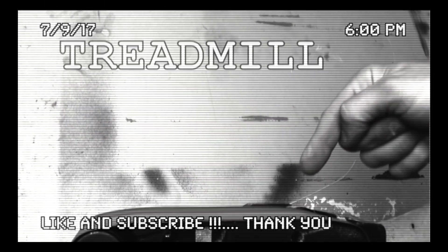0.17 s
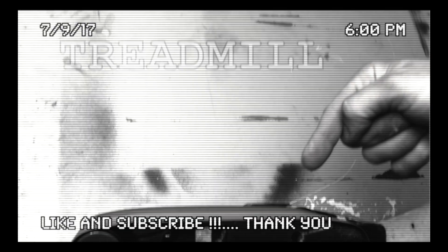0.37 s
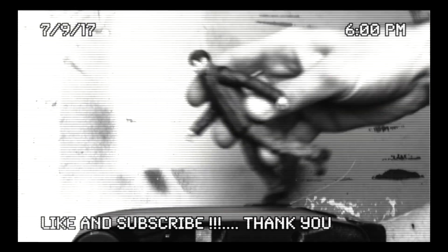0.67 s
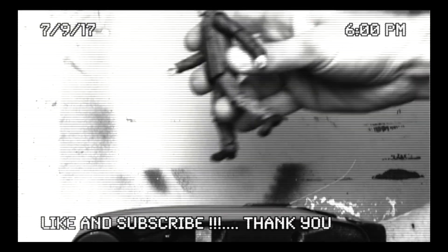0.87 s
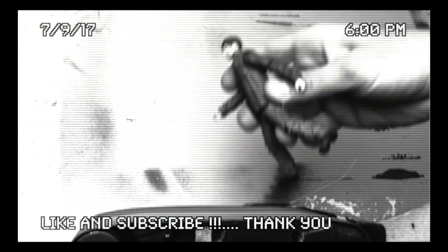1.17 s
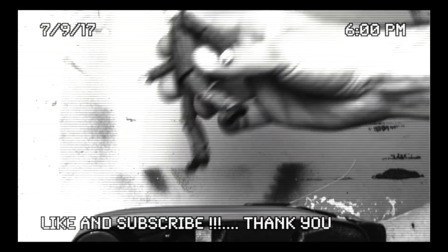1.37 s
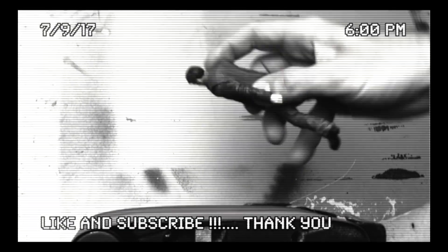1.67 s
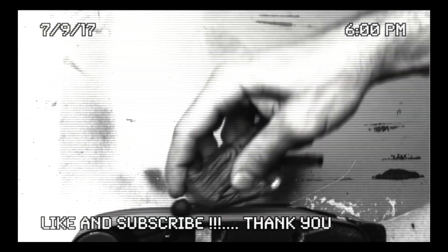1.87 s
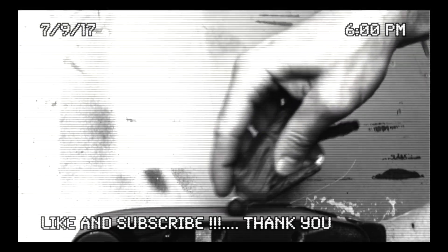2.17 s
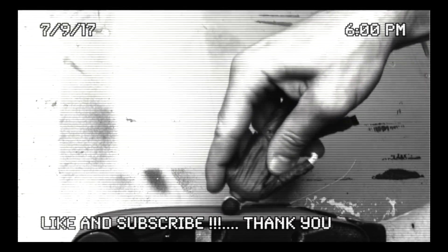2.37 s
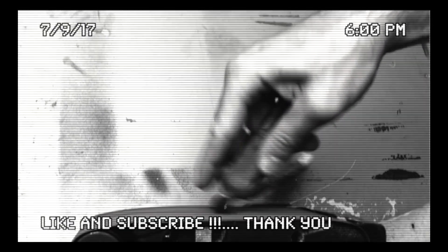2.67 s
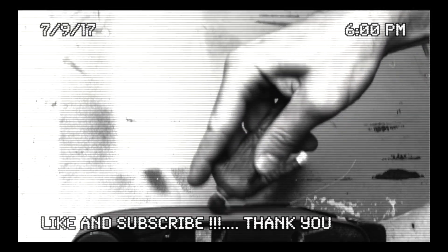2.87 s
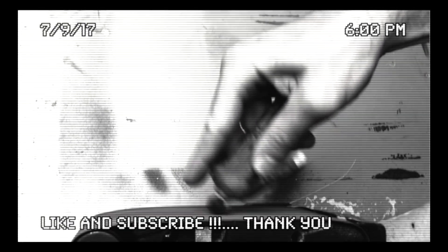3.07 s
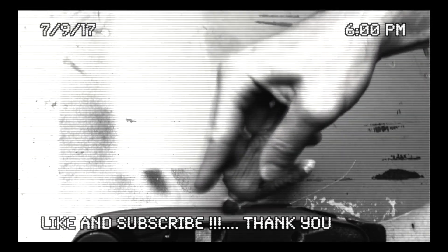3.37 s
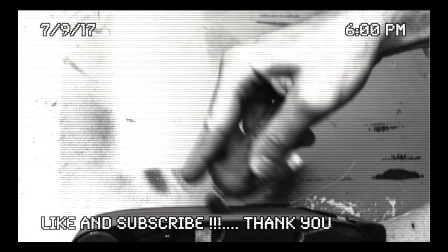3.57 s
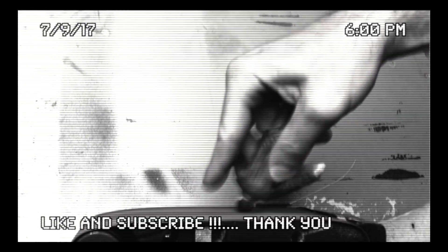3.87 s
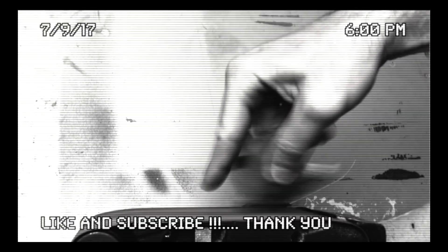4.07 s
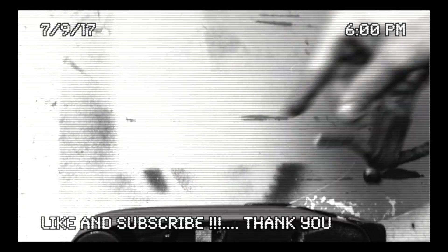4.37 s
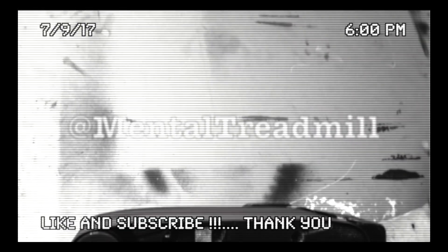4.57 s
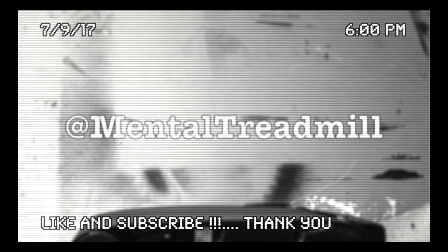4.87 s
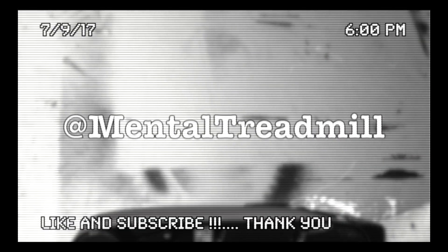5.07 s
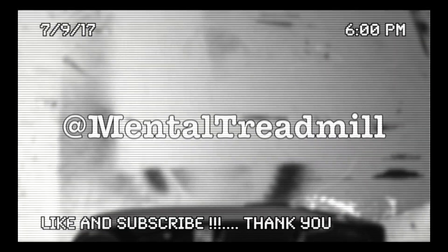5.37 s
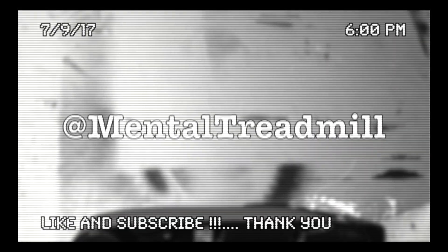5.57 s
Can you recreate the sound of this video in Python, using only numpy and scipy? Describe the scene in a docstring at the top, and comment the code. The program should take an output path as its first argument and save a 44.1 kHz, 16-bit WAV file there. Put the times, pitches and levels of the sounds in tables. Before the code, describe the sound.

A tiny electric motor whirs and rattles close up, then slows slightly and squeaks rhythmically as a toy foot catches, before running free again.

```python
"""A tiny motorised treadmill whirs close to the microphone in a quiet room: its shaft drives a hum, gear
tones and a rattle of teeth in a plastic housing, which settles over the first seconds amid chirps and knocks.
Then a toy figure is pressed on the belt: the motor slows, and the gears squeak each time its foot catches,
less and less often. On release the motor regains its speed; shortly afterwards the level dips briefly.
Periodic parts are sines locked to the shaft angle; rattles and scuffs are random impulses ringing resonances."""
import sys
import numpy as np
from scipy import signal
from scipy.fft import rfft, irfft
from scipy.io import wavfile
from scipy.ndimage import uniform_filter1d

SR = 44100
rng = np.random.default_rng(int(sys.argv[2]) if len(sys.argv) > 2 else 0)


def log_audio(samples):
    """Write samples as a 16-bit WAV file to the path given in sys.argv[1]."""
    # one column per channel
    frames = np.atleast_2d(samples).T
    # limit to full scale, then quantise
    limited = np.clip(frames, -1, 1)
    pcm = np.round(limited * 32767).astype(np.int16)
    wavfile.write(sys.argv[1], SR, pcm)


N = 251796
TIME = np.arange(N) / SR  # seconds

# Mean shaft speed, slower under the figure. Each row: time in seconds, speed in turns per second.
SHAFT_SPEED = [(1.8, 41.667), (1.9, 41.25), (2, 40.956), (2.12, 40.805), (2.35, 40.791), (2.55, 40.577),
               (2.8, 40.481), (3.25, 40.633), (3.75, 40.56), (3.95, 40.69), (4.1, 40.69), (4.2, 41.0),
               (4.4, 41.47), (4.7, 41.68)]
# Touch of the figure on the belt. Each row: time in seconds, contact from 0 to 1.
BELT_CONTACT = [(1.79, 0), (1.83, 1), (4.22, 1), (4.34, 0)]
# Mesh whine, thinning as the catches space out. Each row: time in seconds, change in dB.
WHINE_LULL = [(3.0, 0), (3.5, -5), (4.21, -9), (4.27, -1.5), (4.6, 0)]
# The fine gear's mesh sings up. Each row: centre in seconds, level in dB, length in seconds.
WHINE_SWELLS = [(0.663, -25, 0.028), (0.805, -26, 0.016), (0.958, -23, 0.011), (0.987, -21, 0.01),
                (1.0, -23.5, 0.085), (1.019, -21, 0.01), (1.082, -28, 0.014), (1.28, -32, 0.038),
                (1.56, -32, 0.043), (1.875, -26, 0.06)]
# Thin top whistle of the slowed motor. Each row: time in seconds, level in dB.
WHISTLE_LEVEL = [(1.85, -79), (1.97, -39), (2.14, -36.5), (2.76, -35), (3.7, -51), (4.22, -49), (4.26, -74),
                 (4.3, -73)]
# Lesser gear and rotor tones. Each row: multiple of the shaft rate, free-running level in dB,
# loaded level in dB.
LESSER_ORDERS = [(10, -57, -56), (20, -56, -58), (24, -48.5, -43), (25, -49, -50), (36, -58, -52),
                 (48, -43.5, -53), (60, -50, -50), (65, -50, -54), (68, -44.5, -59), (70, -47, -51),
                 (72, -49, -50), (79, -58, -58), (96, -55.5, -59), (100, -52, -55), (115, -53, -56),
                 (125, -48, -58), (128, -57, -72), (144, -44.5, -43), (160, -47, -46), (165, -59, -43),
                 (168, -53, -58), (175, -53, -52), (190, -58, -53), (192, -57, -58), (200, -55, -52),
                 (288, -71, -63), (336, -65.5, -63)]
# Main parts. Each entry: settled level in dB, extra level while loose in dB, time settled in seconds,
# change under full load in dB.
PART_LEVELS = { "hum": (-39.5, 3.5, 3, -7.5), "pinion": (-37, 10.5, 2.5, -4),
               "whine": (-35, 10.5, 1.44, -3.5), "deck": (-37.5, 10.5, 2.0, -0.5),
               "gearbox": (-35, 11.5, 1.87, 0), "bearing": (-36, 9.5, 0.74, -1.5)}
# Resonances of the deck. Each row: frequency in Hz, width in Hz, relative level in dB.
DECK_MODES = [(215, 46, -11.5), (384, 26, -8), (441, 160, -8), (524, 89, -7), (705, 133, -7.5),
              (919, 142, -2), (1020, 186, -2), (1197, 180, -13.5), (1290, 133, -6.5)]
# Resonances of the gearbox. Each row: frequency in Hz, width in Hz, relative level in dB.
GEARBOX_MODES = [(1686, 225, -8), (1820, 114, -7.5), (2018, 210, -8.5), (2263, 160, -6.5),
                 (2573, 207, -2.5), (2876, 154, -0.5), (3050, 180, 1.5), (3274, 330, -5), (3440, 570, -18),
                 (4120, 146, -4.5)]
# Resonances of the dry shaft bearing. Each row: frequency in Hz, width in Hz, relative level in dB.
BEARING_MODES = [(5000, 420, -5.5), (5635, 46, 6), (5873, 460, 1), (6673, 194, 4.5), (6920, 1180, -5.5)]
# Throb of the rattle with the shaft. Each row: beats per turn, relative depth.
SHAFT_THROB = [(1, 0.025), (2, 0.11), (5, 0.23), (7, 0.2)]
# Surges and lulls of the loose rattle. Each row: centre in seconds, change in dB, length in seconds.
RATTLE_SURGES = [(0.036, 0, 0.15), (0.33, 1.2, 0.048), (0.534, 2.5, 0.066), (0.676, -0.5, 0.094),
                 (0.995, 6.5, 0.017), (1.155, -0.5, 0.035), (1.35, -4, 0.045)]
# Catches of the foot on the belt. Each row: time in seconds, fade of the squeak in seconds, then levels in dB
# of the squeak, its octave, its twelfth, the tones in between and the scuff.
FOOT_CATCHES = [(1.813, .017, -16, -17.5, -41, -52, -45), (1.84, .014, -22.5, -28, -54, -52, -36),
                (1.884, .025, -23, -26, -49, -52, -34), (1.909, .018, -18.5, -20, -45, -52, -43),
                (1.936, .018, -22, -28, -45, -52, -38), (1.966, .016, -29.5, -27, -44, -52, -36),
                (2.007, .022, -31.5, -26.5, -48, -48, -41), (2.028, .013, -32, -28, -55, -50, -43),
                (2.068, .008, -27.5, -23, -48, -50, -45), (2.089, .014, -33, -31, -52, -48, -42),
                (2.129, .018, -34, -24.5, -49, -44, -33), (2.193, .012, -28.5, -32, -47, -44, -39),
                (2.275, .016, -32, -32.5, -50, -45, -39), (2.338, .021, -29.5, -31, -50, -45, -38),
                (2.382, .029, -29.5, -33, -49, -45, -34), (2.441, .015, -31, -30, -47, -43, -32),
                (2.499, .022, -31.5, -30, -39.5, -41, -33), (2.56, .02, -30.5, -31.5, -38, -35.5, -35),
                (2.617, .017, -33.5, -33, -34, -36.5, -36), (2.675, .035, -31.5, -34, -33, -41, -35),
                (2.731, .024, -36, -35, -35, -40, -35), (2.792, .025, -32, -34.5, -30.5, -41.5, -36),
                (2.854, .023, -34.5, -34, -35, -42.5, -31), (2.917, .019, -34, -33, -35, -38, -37),
                (2.981, .021, -37, -37.5, -32, -41, -33), (3.052, .024, -34, -39, -35.5, -40, -35),
                (3.125, .015, -28.5, -33, -37.5, -32, -35), (3.194, .017, -29, -27.5, -39.5, -35.5, -32),
                (3.26, .019, -30.5, -30, -40.5, -39, -34), (3.328, .024, -33.5, -34.5, -36.5, -40, -36),
                (3.405, .017, -29.5, -32, -35.5, -39, -43), (3.479, .014, -29, -28.5, -39.5, -39, -40),
                (3.56, .02, -33, -36, -41, -37, -38), (3.636, .018, -27.5, -28, -38, -50, -48),
                (3.724, .017, -30.5, -32, -36.5, -41.5, -35), (3.824, .02, -30, -30, -38.5, -41.5, -42),
                (3.92, .013, -25.5, -32, -48.5, -47, -41), (4.033, .023, -29.5, -30, -42.5, -43, -40)]
# Resonances of the scuffing foot. Each row: frequency in Hz, width in Hz, relative level in dB.
SCUFF_MODES = [(1020, 270, -7), (1154, 120, -2), (1310, 300, -7.5), (1630, 88, -2)]
# Resonances of the rasping rubber foot. Each row: frequency in Hz, width in Hz, relative level in dB.
RASP_MODES = [(3100, 280, 2), (3410, 150, 4), (6340, 600, -8), (7970, 900, -16), (9200, 1000, -19)]
# Bright tick at the peak of a bite. Each row: frequency in Hz, width in Hz, relative level in dB.
TICK_MODES = [(9700, 560, 0)]
# Knocks of a loose part or the foot on the deck. Each row: start in seconds, level in dB, frequency in Hz.
DECK_KNOCKS = [(0.468, -21, 1050), (0.541, -19.5, 980), (0.58, -22, 950), (0.783, -25, 900),
               (1.02, -25, 1050), (1.171, -18.5, 930), (1.479, -25, 1010), (1.732, -28, 1030),
               (2.128, -28, 1370), (2.503, -21.5, 1160), (2.566, -24.5, 960), (2.864, -28, 1110),
               (2.986, -15.5, 1110), (4.082, -27, 1025), (4.1, -26.5, 1000)]
# Chirps of the dry bearings and gears. Each row: centre in seconds, level in dB, frequency in Hz,
# length in seconds.
DRY_CHIRPS = [(0.054, -27, 6630, 0.0074), (0.083, -21, 3130, 0.0054), (0.089, -29, 6680, .006),
              (0.18, -31, 5940, .009), (0.238, -26, 6040, 0.011), (0.275, -34, 5900, 0.013),
              (0.302, -29, 6670, .008), (0.334, -32, 4190, 0.015), (0.364, -28, 6740, 0.0076),
              (0.658, -30.5, 5940, 0.028), (0.73, -35, 4125, .018), (0.896, -27.5, 5960, .007),
              (0.95, -36, 4140, .025), (1.044, -37, 4200, .02), (1.086, -31, 6010, .008),
              (1.127, -26, 3020, 0.0094), (1.775, -34.5, 4150, .03), (1.895, -36, 4110, .02),
              (1.93, -28, 3110, 0.026), (4.87, -29, 6720, .007)]
# Noise colour of brushes and belt. Each row: frequency in Hz, relative level in dB per Hz.
BRUSH_SPECTRUM = [(30, -50), (110, -21.5), (400, -10), (1700, -2.5), (3700, -2), (4600, -5), (5400, -6.5),
                  (6300, -1.5), (7700, -1), (8800, -8.5), (10500, -10.5), (12500, -17.5), (15000, -29)]

# tones, as multiples of the shaft rate
HUM_ORDER, PINION_ORDER, MESH_ORDER, WHISTLE_ORDER = 5, 12, 80, 384
# the touch damps the hum; every catch lifts the pinion tone
HUM_TOUCH_DB, PINION_THROB_DB = -3, 2.5
LOOSE_S = 0.054  # the gears stay fully loose until here
TIGHT_LOAD = 0.073  # share of full load at which the lesser tones reach their loaded levels
GEAR_TONES_LOOSE_DB = 10
DECK_FLICKER_DB, GEARBOX_FLICKER_DB = 1.1, 1.3
GRIT_DB, GRIT_PER_S = -32, 200
SQUEAK_RISE_S, SQUEAK_FLUTTER_DB, BEND_HZ = 0.0085, 1.7, 40
BITE_SHARE = 0.17  # the foot bites after this share of the time between catches
RASP_DB, TICK_DB = -9.5, -6  # against the squeak; against the twelfth
KNOCK_RISE_S, KNOCK_OVERTONE, KNOCK_OVERTONE_DB = 0.0018, 1.45, -8
CHIRP_WIDTH_HZ = 190
HISS_DB = -35
PAN_DB = -0.04  # added to the left, taken from the right
LOW_CUT_HZ, CUTOFF_HZ = 147, 15800


def shaft(sag, flutter):
    """Phase is the integral of speed: every catch brakes the motor, which then picks up again."""
    brake = swells(0, delay=0.019, rise=0.026, fall=0.05)
    brake = brake - uniform_filter1d(brake, size=SR // 6)
    speed = curve(SHAFT_SPEED) - sag * brake + flutter * drift(5.9)
    return 2 * np.pi * np.cumsum(speed) / SR


def belt_load():
    """Torque and speed: the weight on the belt, 0-1, slows the motor in proportion."""
    speed = curve(SHAFT_SPEED)
    return (speed.max() - speed) / np.ptp(speed)


def play(part):
    """Backlash: looseness falls evenly from 1 to 0 as the part settles."""
    _, _, settled_s, _ = PART_LEVELS[part]
    return np.interp(TIME, [LOOSE_S, settled_s], [1, 0])


def level_db(part, load, slack=1):
    """Backlash and load: a part is louder while loose, and its level changes with the load."""
    settled_db, loose_db, _, loaded_db = PART_LEVELS[part]
    return settled_db + loose_db * play(part) * slack + loaded_db * load


def motor_hum(angle, load, touch):
    """Harmonic locking: the hum follows the shaft, and contact damps it."""
    db = level_db("hum", load) + HUM_TOUCH_DB * touch + 0.72 * drift(27)
    return from_db(db) * tone(HUM_ORDER * angle)


def pinion_tone(angle, touch, slack):
    """Tooth-passing tone: contact takes up the pinion's play, and every catch throbs in its level."""
    throb_db = PINION_THROB_DB * swells(0, delay=0.008, rise=0.02, fall=0.025)
    db = level_db("pinion", touch, slack) + throb_db + 1.0 * drift(44)
    return from_db(db) * tone(PINION_ORDER * angle)


def mesh_whine(angle, load, touch, slack):
    """Gear meshing: tooth contacts whine, with wavering phase and level as loaded teeth mesh less evenly."""
    slip = (0.15 + 0.6 * load) * drift(25)  # radians
    flutter_db = 0.8 + 1.5 * play("pinion") * slack + 1.8 * touch
    singing_power = sum(from_db(db) ** 2 * np.exp(-2 * ((TIME - s) / length) ** 2)
                        for s, db, length in WHINE_SWELLS)
    steady = from_db(level_db("whine", load) + curve(WHINE_LULL))
    strength = np.sqrt(steady ** 2 + singing_power)
    return strength * from_db(flutter_db * drift(95)) * tone(MESH_ORDER * angle + slip)


def top_whistle(angle, tight):
    """High-order harmonic: the loaded motor whistles at a large multiple of the shaft rate."""
    level = from_db(curve(WHISTLE_LEVEL) + 2.8 * drift(18))
    return tight * level * tone(WHISTLE_ORDER * angle + 0.3 * drift(80))


def motor(angle, load, tight, touch):
    """Superposition of the hum, pinion tone, mesh whine and top whistle."""
    # the first touch takes up the play for good
    slack = np.interp(TIME, [BELT_CONTACT[0][0], BELT_CONTACT[1][0]], [1, 0])
    hum = motor_hum(angle, load, touch)
    pinion = pinion_tone(angle, touch, slack)
    whine = mesh_whine(angle, load, touch, slack)
    return hum + pinion + whine + top_whistle(angle, tight)


def gear_tones(angle, tight, play_db, waver_db, jitter):
    """Order spectrum: lesser multiples of the shaft rate, the lower ones growing with the gears' play."""
    out = 0
    for multiple, free_db, loaded_db in LESSER_ORDERS:
        db = free_db + tight * (loaded_db - free_db) + play_db / (1 + (multiple / 125) ** 4)
        phase = multiple * angle + rng.uniform(0, 2 * np.pi) + jitter * drift(7.6)
        out = out + from_db(db + waver_db * drift(47)) * tone(phase)
    return out


def rattle(angle, modes, per_s, spread_db, flicker_db, throb):
    """Impact excitation: teeth knock at random, harder at certain shaft angles, and ring the resonances."""
    beat = sum(depth * np.cos(beats * angle + rng.uniform(0, 2 * np.pi)) for beats, depth in SHAFT_THROB)
    force = from_db(spread_db * rng.standard_normal(N) + flicker_db * drift(20)) * (1 + throb * beat)
    impacts = rng.random(N) < per_s / SR
    return resonate(force * impacts, modes)


def housing_rattle(angle, load):
    """Modal response: teeth knock at random, each part at its own rate, and ring the deck, the gearbox and the
    dry bearing."""
    surge_db = sum(db * np.exp(-((TIME - s) / length) ** 2) for s, db, length in RATTLE_SURGES)
    deck = from_db(level_db("deck", load) + surge_db) * rattle(
        angle, DECK_MODES, per_s=1800, spread_db=0.5, flicker_db=DECK_FLICKER_DB, throb=0.3)
    gearbox_flicker_db = GEARBOX_FLICKER_DB + 0.49 * play("gearbox")
    gearbox = from_db(level_db("gearbox", load) + surge_db) * rattle(
        angle, GEARBOX_MODES, per_s=5000, spread_db=0.5, flicker_db=gearbox_flicker_db, throb=0.95)
    bearing = from_db(level_db("bearing", load)) * rattle(
        angle, BEARING_MODES, per_s=7000, spread_db=1.5, flicker_db=1.5, throb=0.23)
    return deck + gearbox + bearing


def grit(angle, loose):
    """Sparse impacts: single hard tooth strikes ring gearbox and bearing while the gears are loose."""
    modes = GEARBOX_MODES + BEARING_MODES[2::2]
    strikes = rattle(angle, modes, per_s=GRIT_PER_S, spread_db=1, flicker_db=3, throb=1)
    return from_db(GRIT_DB) * loose ** 2 * strikes


def catches(angle):
    """Stick-slip: a caught foot loads the gears, whose mesh squeaks and bends down, and the foot scrapes."""
    s, fade, squeak_db, octave_db, twelfth_db, halves_db, scuff_db = np.transpose(FOOT_CATCHES)
    bite_s = BITE_SHARE * np.gradient(s)
    bend_hz = BEND_HZ * swells(0, delay=-0.004, rise=0.012, fall=0.009)
    mesh = MESH_ORDER * angle + 2 * np.pi * np.cumsum(bend_hz) / SR + 0.19 * drift(110)
    squeak = swells(squeak_db, delay=0, rise=SQUEAK_RISE_S, fall=fade) * tone(mesh)
    octave = swells(octave_db, delay=0.0031, rise=SQUEAK_RISE_S, fall=fade) * tone(2 * mesh)
    # the twelfth follows as the foot bites
    twelfth = swells(twelfth_db, delay=bite_s, rise=0.009, fall=0.009) * tone(3 * mesh)
    # alternate teeth bite harder, which adds tones halfway between the three
    between = tone(3 * mesh / 2 + 0.5 * drift(120)) + 0.55 * tone(5 * mesh / 2)
    halves = swells(halves_db, delay=bite_s, rise=0.012, fall=0.015) * between
    tones = sum(part * from_db(SQUEAK_FLUTTER_DB * drift(130)) for part in (squeak, octave, twelfth, halves))
    return tones + foot_friction(squeak_db, twelfth_db, scuff_db, fade, bite_s)


def foot_friction(squeak_db, twelfth_db, scuff_db, fade, bite_s):
    """Friction noise: random contacts ring the foot as a scuff, a rasp and a bright tick at each bite."""
    steady = np.ones(N)
    scuff = swells(scuff_db, delay=0.007, rise=0.007, fall=0.011) * resonate(steady, SCUFF_MODES)
    rasp = swells(squeak_db + RASP_DB, delay=0.002, rise=0.004, fall=fade) * resonate(steady, RASP_MODES)
    tick = swells(twelfth_db + TICK_DB, delay=bite_s, rise=0.003, fall=0.005) * resonate(steady, TICK_MODES)
    return scuff + rasp + tick


def knock(s, db, hz):
    """Heavily damped impact: the deck swells within two or three cycles and dies nearly as fast."""
    out = np.zeros(N)
    near = slice(int(s * SR), int((s + 0.05) * SR))
    t = np.maximum(TIME[near] - s, 0)
    age = t / KNOCK_RISE_S
    body = age * np.exp(1 - age) * np.sin(2 * np.pi * hz * t)
    edge = from_db(KNOCK_OVERTONE_DB) * np.exp(-age) * np.sin(2 * np.pi * KNOCK_OVERTONE * hz * t)
    out[near] = from_db(db) * (body + edge)
    return out


def chirp(s, db, hz, length):
    """Friction-driven resonance: a swell of tiny slips rings one mode."""
    out = np.zeros(N)
    near = slice(max(int((s - 0.1) * SR), 0), int((s + 0.1) * SR))
    swell = np.exp(-((TIME[near] - s) / length) ** 2)
    ring = resonate(swell, [(hz, CHIRP_WIDTH_HZ, 0)])
    out[near] = from_db(db) * ring * np.sqrt(np.mean(swell ** 2))
    return out


def brush_hiss(angle):
    """Broadband friction: brushes and belt hiss, modulated once per turn and at random."""
    return from_db(HISS_DB) * hiss(BRUSH_SPECTRUM) * (1 + 0.027 * np.cos(angle) + 0.12 * drift(150))


def swells(levels_db, delay, rise, fall):
    """Power addition: a Gaussian swell and fade per catch; level, delay and fall may vary by catch."""
    power, each = np.zeros(N), np.ones(len(FOOT_CATCHES))
    for row, db, late, fade in zip(FOOT_CATCHES, levels_db * each, delay * each, fall * each):
        near = slice(int((row[0] - 0.06) * SR), int((row[0] + 0.12) * SR))
        t = TIME[near] - row[0] - late
        power[near] += from_db(db) ** 2 * np.exp(-2 * (t / np.where(t < 0, rise, fade)) ** 2)
    return np.sqrt(power)


def resonate(x, modes):
    """Modal superposition: parallel resonances, each applied twice for dark valleys; unit rms."""
    out = 0
    for hz, width, db in modes:
        # each pass is 1.55 times wider, since the second pass narrows the peak again
        r = np.exp(-np.pi * width * 1.55 / SR)
        section = [(1 - r * r) / 2, 0, (r * r - 1) / 2, 1, -2 * r * np.cos(2 * np.pi * hz / SR), r * r]
        # every contact reaches each resonance with a strength and sign of its own
        drive = x * rng.standard_normal(len(x)) + 1e-18
        out = out + from_db(db) * signal.sosfilt([section, section], drive)
    return rms_one(out)


def hiss(spectrum):
    """Spectral shaping: white noise weighted to a given colour; unit rms."""
    hz, db = np.transpose(spectrum)
    bins = np.maximum(np.arange(N // 2 + 1) * SR / N, 1)
    gain = from_db(np.interp(np.log(bins), np.log(hz), db))
    return rms_one(irfft(rfft(rng.standard_normal(N)) * gain, N))


def drift(rate):
    """Low-passed chance: a smooth random curve changing about rate times a second; spread 1."""
    size = 2 ** 13
    hz = np.arange(size // 2 + 1) * SR / N
    slow = irfft(rfft(rng.standard_normal(size)) / (1 + (hz / rate) ** 2), size)
    return np.interp(np.arange(N) * size / N, np.arange(size), rms_one(slow))


def tone(angle):
    """Simple harmonic motion: a sine of unit rms."""
    return np.sqrt(2) * np.sin(angle)


def curve(rows):
    """Linear interpolation of (seconds, value) rows at every sample."""
    return np.interp(TIME, *np.transpose(rows))


def from_db(db):
    """Logarithmic level: decibels to amplitude gain."""
    return 10 ** (np.asarray(db) / 20)


def rms_one(x):
    """Normalisation to unit rms."""
    return x / np.sqrt(np.mean(x ** 2) + 1e-20)


def low_cut(x, hz):
    """Second-order high-pass filtering."""
    return signal.sosfilt(signal.butter(2, hz, "high", fs=SR, output="sos"), x)


def scene():
    """Superposition: all turning parts share one shaft, and the sum is almost centred in stereo."""
    load = belt_load()
    tight = np.minimum(load / TIGHT_LOAD, 1)
    touch = curve(BELT_CONTACT)
    loose = play("gearbox")
    angle = shaft(sag=0.3, flutter=0.014)
    machine = motor(angle, load, tight, touch)
    machine = machine + gear_tones(angle, tight, GEAR_TONES_LOOSE_DB * loose, waver_db=1.6, jitter=0.2)
    machine = machine + housing_rattle(angle, load) + grit(angle, loose)
    machine = machine + catches(angle)
    machine = machine + sum(knock(*row) for row in DECK_KNOCKS)
    machine = machine + sum(chirp(*row) for row in DRY_CHIRPS)
    machine = machine + brush_hiss(angle)
    return machine * from_db([[PAN_DB], [-PAN_DB]])


def record(dry):
    """Band limiting: the level dips briefly once, the bass is thinned, and the top is cut."""
    dip = np.interp(TIME, [4.725, 4.731, 4.735, 4.747], [1, 0.05, 0.12, 1])
    thinned = low_cut(dry * dip, LOW_CUT_HZ)
    top_cut = signal.ellip(12, 0.1, 80, CUTOFF_HZ, fs=SR, output="sos")
    return signal.sosfilt(top_cut, thinned)


dry = scene()
out = record(dry)
log_audio(out)
```